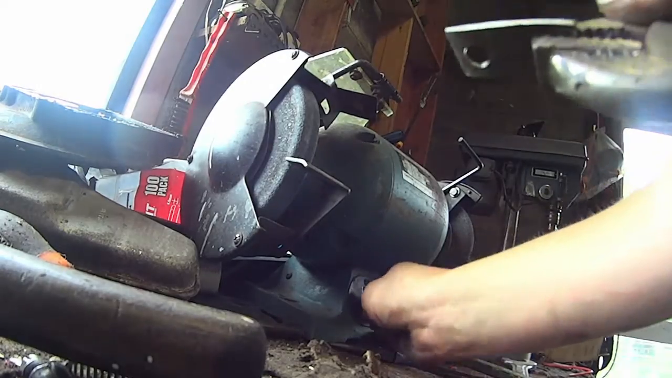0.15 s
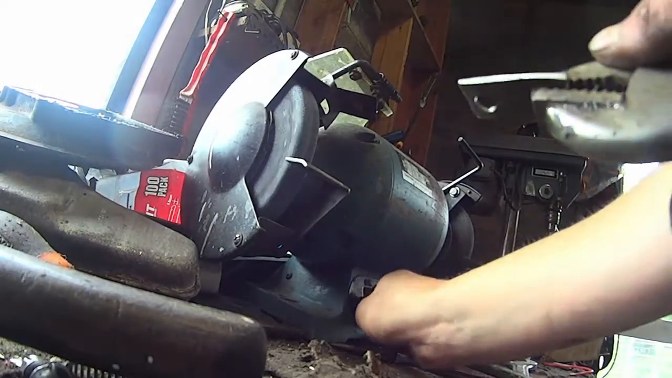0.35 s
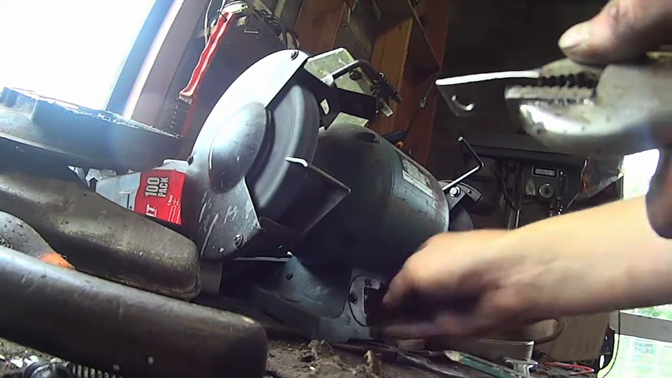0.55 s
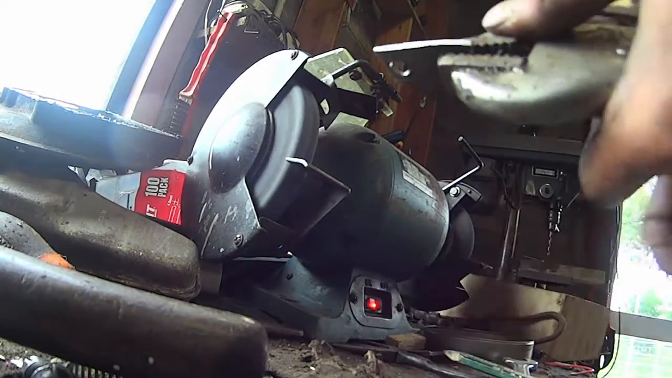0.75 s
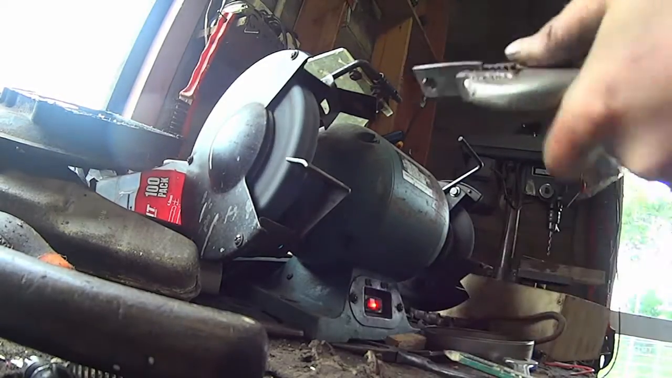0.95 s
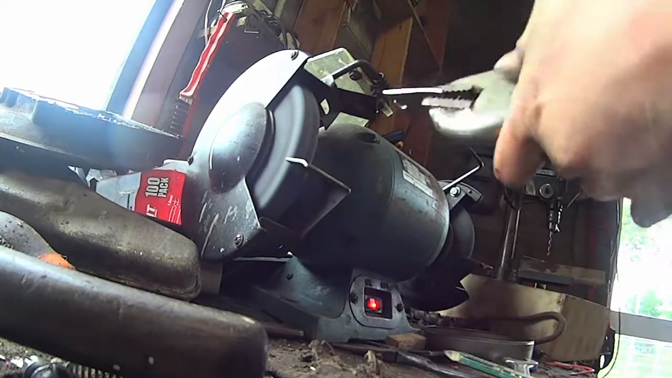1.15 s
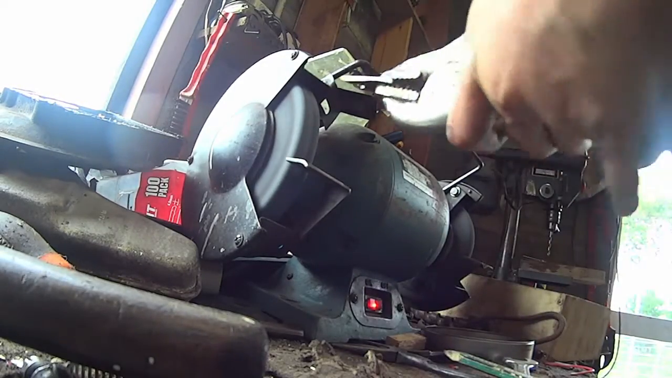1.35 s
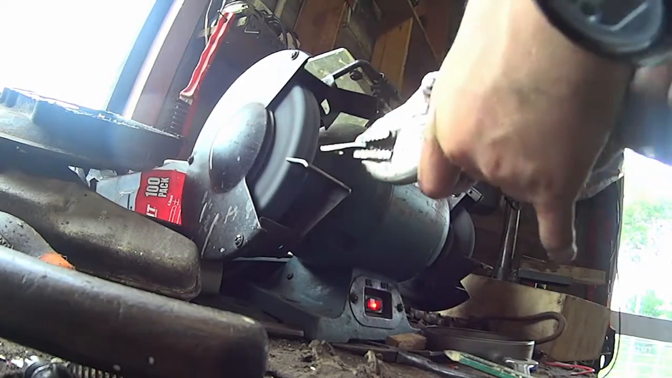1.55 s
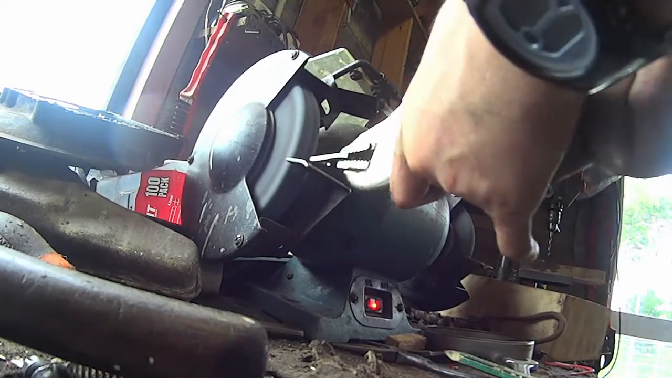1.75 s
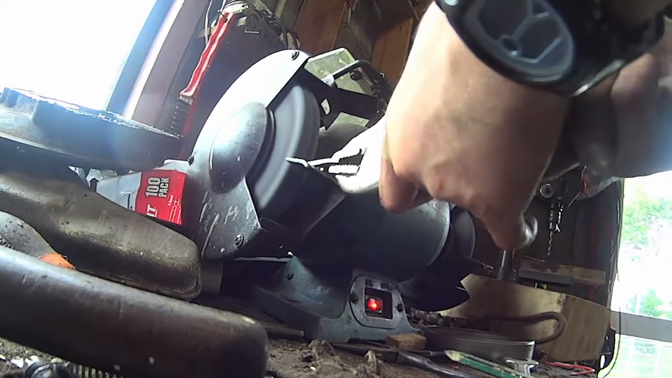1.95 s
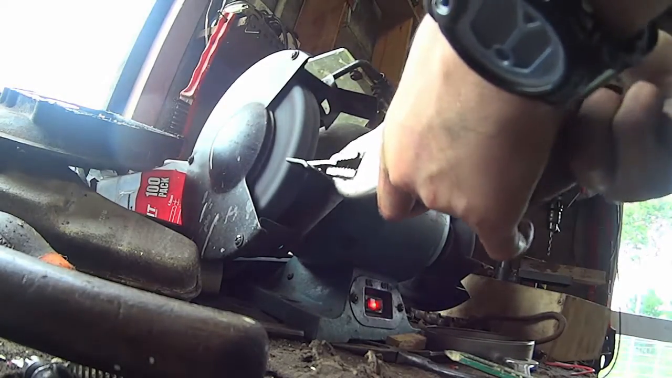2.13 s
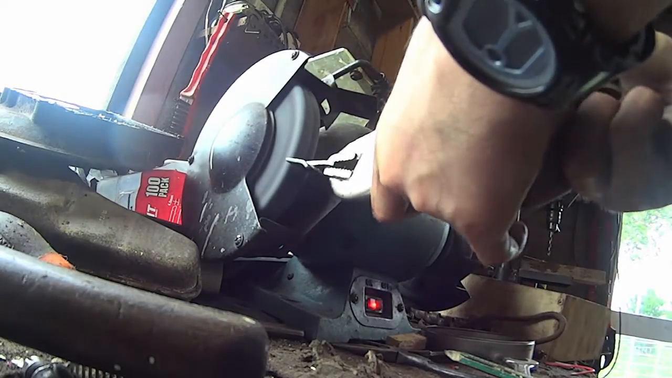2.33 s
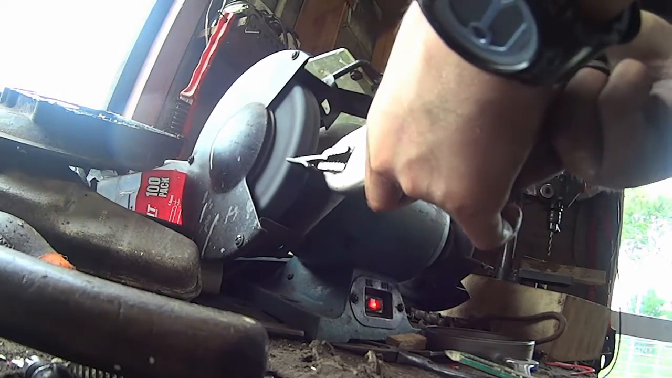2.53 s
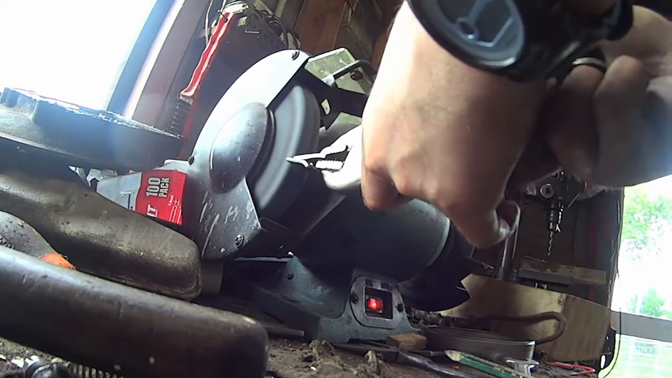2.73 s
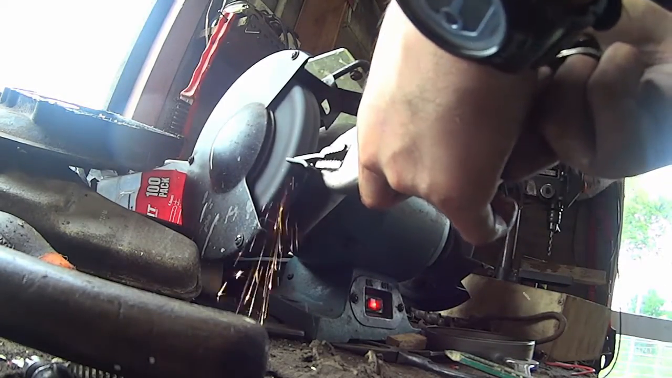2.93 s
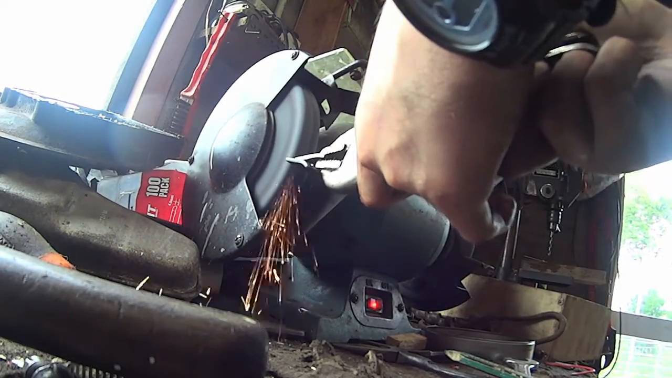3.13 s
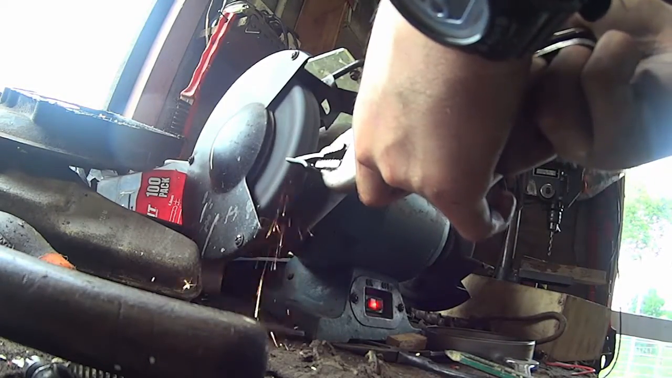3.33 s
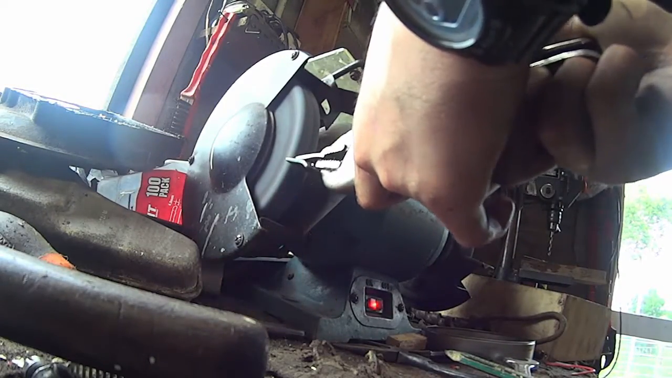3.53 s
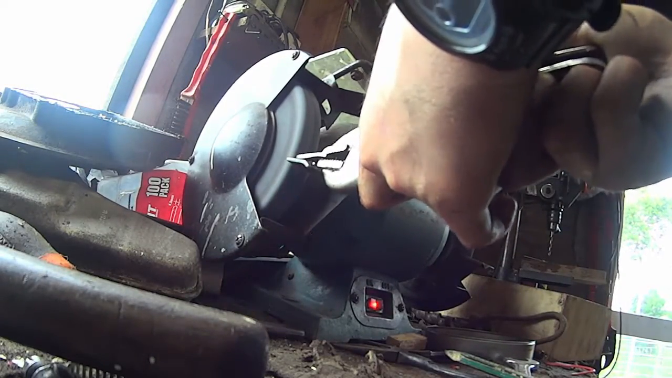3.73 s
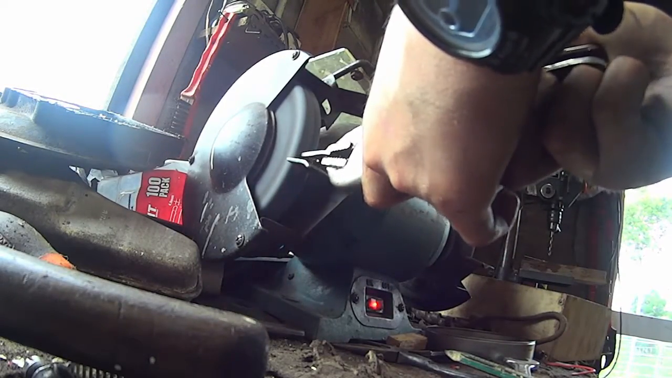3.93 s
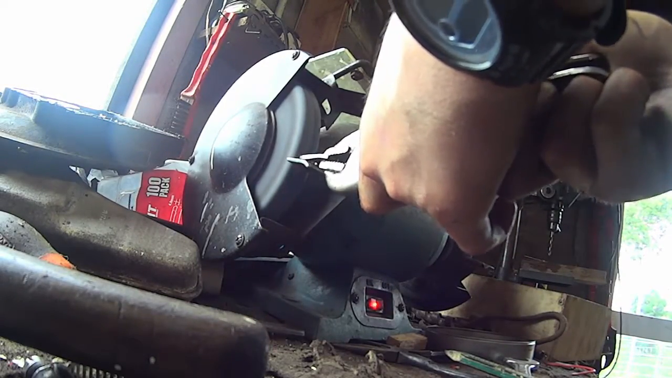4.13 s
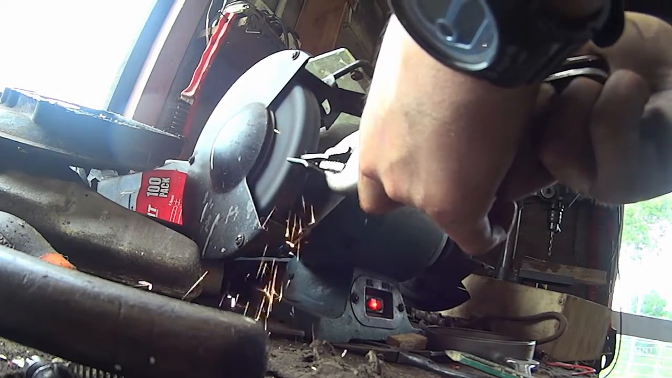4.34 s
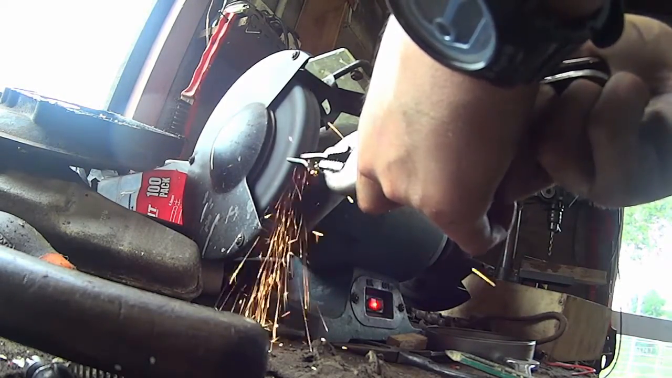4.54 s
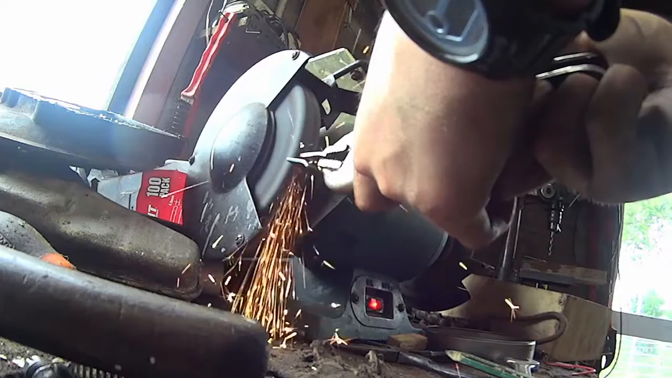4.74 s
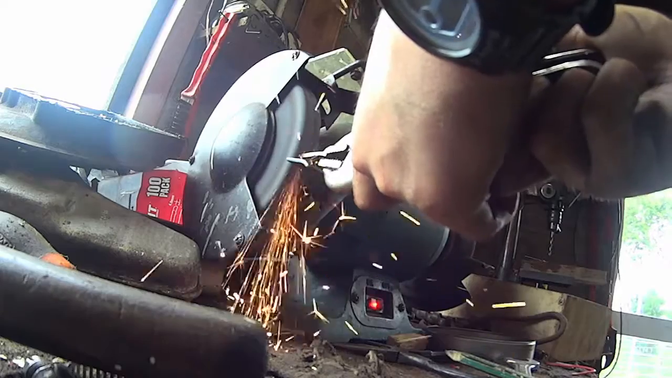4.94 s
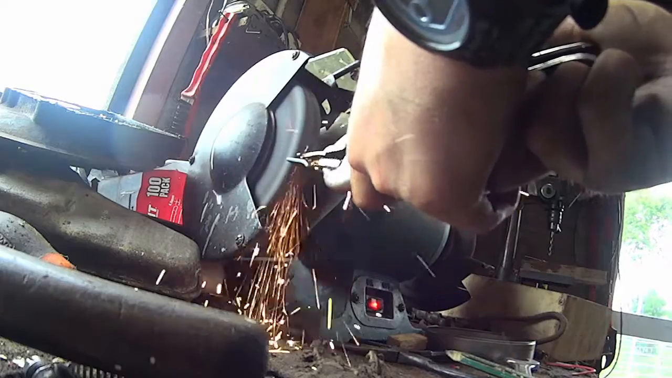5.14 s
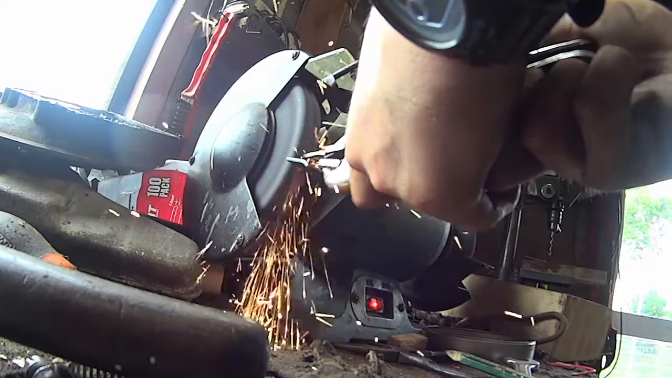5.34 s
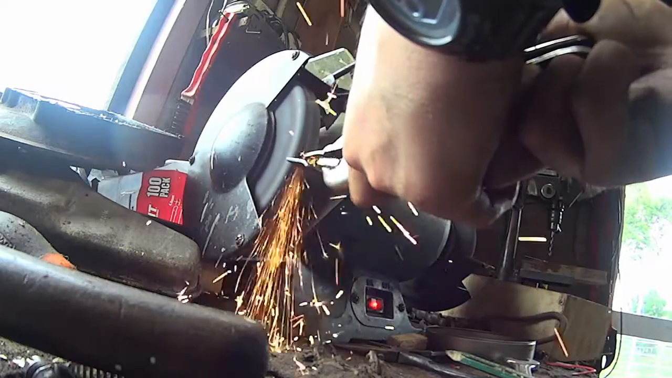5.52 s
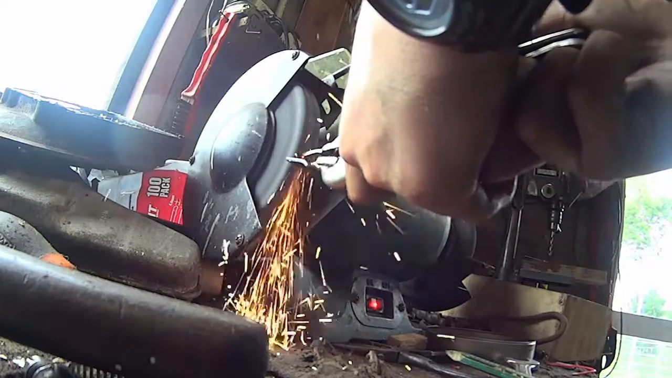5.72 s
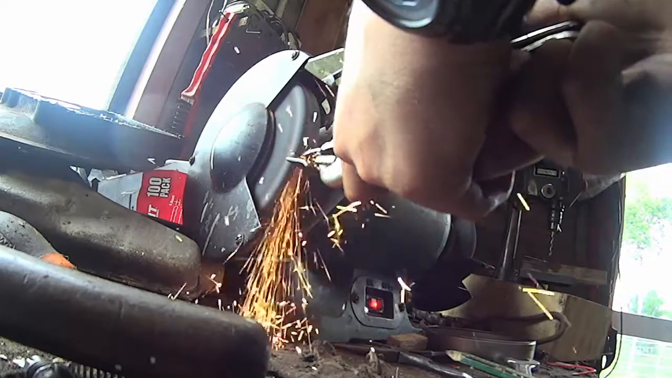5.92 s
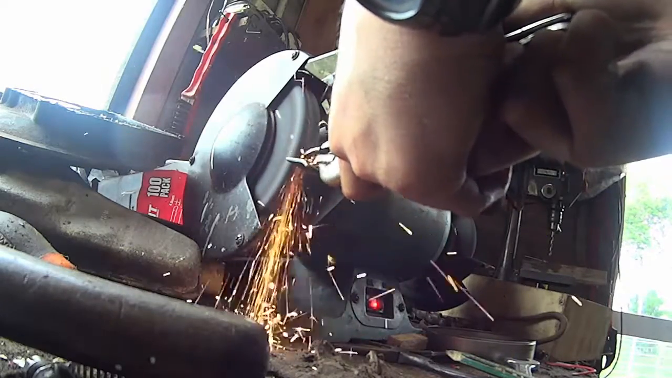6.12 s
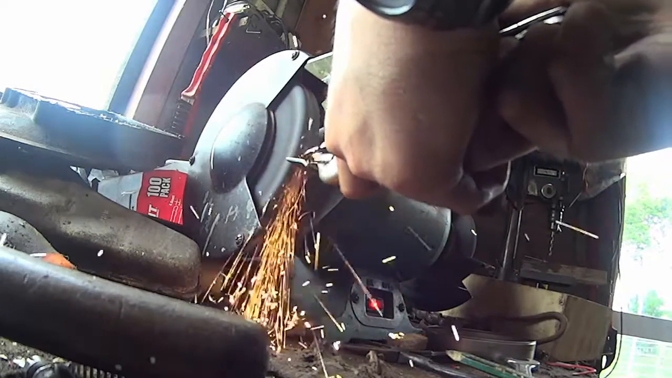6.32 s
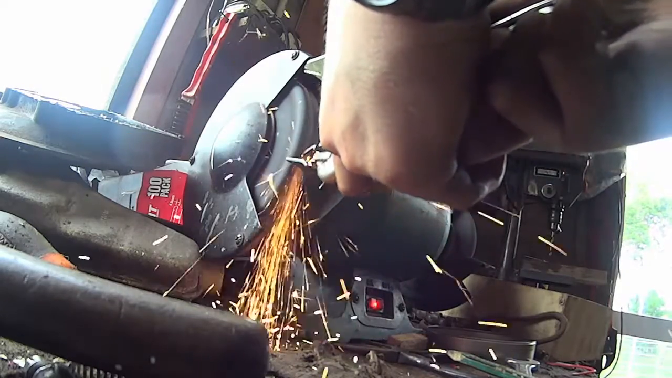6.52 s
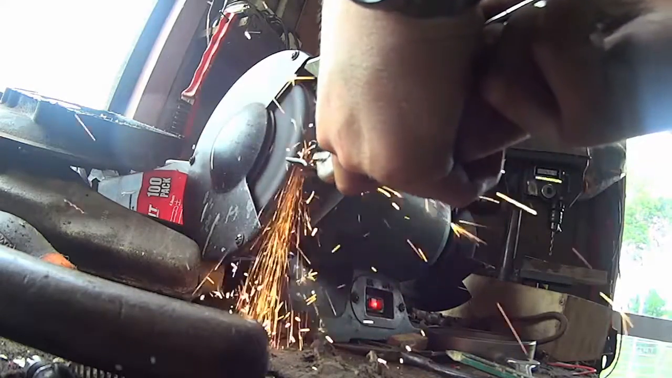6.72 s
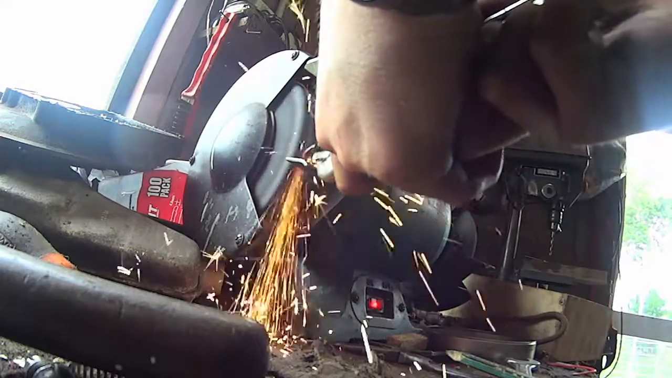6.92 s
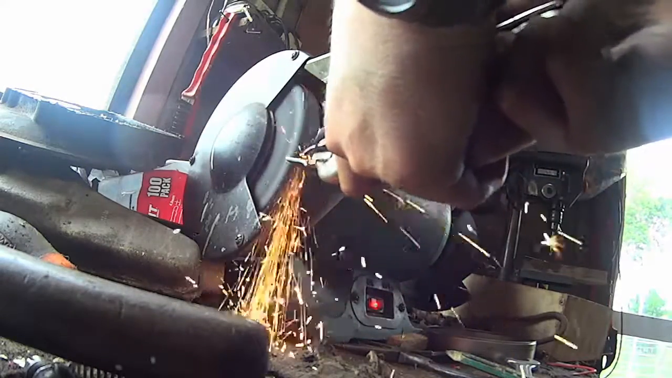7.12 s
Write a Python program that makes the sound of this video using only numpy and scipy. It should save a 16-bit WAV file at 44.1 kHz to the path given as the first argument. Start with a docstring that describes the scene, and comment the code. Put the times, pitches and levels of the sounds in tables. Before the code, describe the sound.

Close up at a workbench: quiet room, a hard click, then a mains buzz and metallic housing rattle as a motor winds up. The wheel runs free with a droning, gently beating hum and soft ticks from pliers. Light, gritty touches follow, pulsing with each turn, before sustained grinding rings the steel part, chattering and squealing while the wheel slows slightly. Short room reflections; loud parts sound compressed.

```python
"""In a small workshop a bench grinder is switched on, buzzes up to speed and runs free.
Mains buzz, noise-driven housing modes, a bench drone, hum and coloured air make the motor.
A steel part in locking pliers touches the wheel lightly, then is pressed in: partly returning grit
rings modes of the part, and waves worn into the wheel lock its chatter into a squeal.
The loaded wheel slows, and gain control ducks the motor under the loud grinding."""
import sys
import numpy as np
from scipy import signal
from scipy.fft import rfft, irfft, next_fast_len
from scipy.io import wavfile
from scipy.ndimage import uniform_filter1d, minimum_filter1d, map_coordinates

SR = 44100
rng = np.random.default_rng(int(sys.argv[2]) if len(sys.argv) > 2 else 0)


def log_audio(samples):
    """Write samples as a 16-bit WAV file to the path given in sys.argv[1]."""
    # one column per channel
    frames = np.atleast_2d(samples).T
    # limit to full scale, then quantise
    limited = np.clip(frames, -1, 1)
    pcm = np.round(limited * 32767).astype(np.int16)
    wavfile.write(sys.argv[1], SR, pcm)


N = 320607  # samples
BUZZ_HZ = 100.2  # mains buzz, shared by the start-up and the running hum


def gain_of(db):
    """Turns dB into an amplitude gain."""
    return 10 ** (np.asarray(db) / 20)


def evened(x):
    """Scales a signal to mean power 1."""
    return x / np.sqrt(np.mean(x ** 2) + 1e-20)


def curves(rows, outside=None):
    """Draws the columns of a timed table as curves, one value a sample."""
    s, *columns = np.transpose(rows)
    time_s = np.arange(N) / SR
    return [np.interp(time_s, s, column, outside, outside) for column in columns]


def colour(x, points):
    """Minimum-phase filter through the given spectrum; white input of power 1 leaves with power 1."""
    hz, db = np.transpose(points)
    bin_hz = abs(np.fft.fftfreq(8192, 1 / SR))
    bin_db = np.interp(np.log(bin_hz + 1), np.log(hz), np.maximum(db, -100), -100, -100)
    log_gain = bin_db * np.log(10) / 20
    minimum_phase = np.exp(np.conj(signal.hilbert(log_gain)))
    taps = np.fft.ifft(minimum_phase).real[:4096]
    return signal.oaconvolve(x, taps / np.linalg.norm(taps))[:N]


def ring(x, hz, width_hz):
    """A damped mode at a fixed or moving pitch; white input of power 1 leaves with power 1."""
    turn = np.exp(2j * np.pi * np.cumsum(hz * np.ones(N)) / SR)
    decay = np.exp(-np.pi * width_hz / SR)
    envelope = signal.lfilter([np.sqrt(2 * (1 - decay * decay))], [1, -decay], x / turn)
    return (turn * envelope).real


def body(x, modes):
    """Rings modes side by side with alternating sign, sharing power 1 by their relative dB."""
    share = gain_of([db for _, _, db in modes])
    rung = sum((-1) ** k * share[k] * ring(x, hz, width) for k, (hz, width, _) in enumerate(modes))
    return rung / np.linalg.norm(share)


def wander(rate_hz):
    """Slow random drift of power 1: noise rolled off above the rate."""
    size = next_fast_len(N)
    rolloff = 1 + (np.fft.rfftfreq(size, 1 / SR) / rate_hz) ** 2
    return evened(irfft(rfft(rng.standard_normal(size)) / rolloff, size)[:N])


def highpass(x, hz):
    """Third-order high-pass."""
    return signal.sosfilt(signal.butter(3, hz, "high", fs=SR, output="sos"), x)


# Room tone spectrum: pitch_hz [Hz], level_db [relative dB per Hz]
ROOM_COLOUR = [(20, -20), (110, -18), (180, -6), (320, 0), (420, -10.5), (1500, -21.5), (11200, -27)]


def room_tone():
    """The quiet room: steady noise weighted towards the low mids."""
    return gain_of(-50) * colour(rng.standard_normal(N), ROOM_COLOUR)


# Motor levels up to speed: start_s [s], drone_db [dB before a 3 dB lift], hum_db [dB], air_db [dB]
MOTOR_LEVELS = [(.31, -81, -90, -87.5), (.4, -66, -52, -70), (.85, -33, -60.5, -30.5), (1.0, -38, -48, -23),
                (1.3, -29, -44, -30), (1.6, -28, -46, -29)]
# Bench modes: pitch_hz [Hz], width_hz [Hz], level_db [relative dB]
BENCH_MODES = [(244.7, 24.3, 0.5), (281.5, 51, 2), (326.7, 44, -0.5), (394.6, 19, -7), (575, 160, -9.5),
               (1200, 12, -18), (1590, 18, -37)]
# Air of the wheels: pitch_hz [Hz], level_db [relative dB per Hz]
AIR_COLOUR = [(260, -10.5), (450, -7.5), (596, -14.5), (821, -16.5), (1600, -6), (1910, -11.5),
              (3000, -13.5), (4100, -17), (5490, -5), (6500, -11), (11000, -9), (14300, -35), (22000, -120)]
# Low shaking of the bench: pitch_hz [Hz], level_db [relative dB per Hz]
SHAKE_COLOUR = [(15, -25), (25, -22), (40, 2), (65, -6.5), (130, -8), (230, 2.5), (300, -44)]
# the hum beats against twice the wheel's turn, at a set rate
BEAT_HZ, BEAT_DEPTH, BEAT_TOP_S = 1.265, 0.3, 1.73


def running():
    """The motor: noise rings the bench in lumps, with a beating sine hum, low shaking and airy noise."""
    drone_db, hum_db, air_db = curves(MOTOR_LEVELS)
    time_s = np.arange(N) / SR
    lumps = rng.standard_normal(N) * gain_of(2.7 * wander(38))
    drone = body(lumps, BENCH_MODES) * gain_of(drone_db + 3.0)
    beat = 1 + BEAT_DEPTH * np.cos(2 * np.pi * BEAT_HZ * (time_s - BEAT_TOP_S))
    hum_gain = np.sqrt(2) * beat * gain_of(hum_db + 0.93 * wander(10.0))
    hum = hum_gain * np.sin(2 * np.pi * BUZZ_HZ * time_s)
    shudder_db = curves([(.85, 1), (1.3, 5.3), (1.6, 1.6)])[0]  # the wheels pass the bench's own pitch
    shake = gain_of(hum_db + shudder_db + 1.0) * colour(rng.standard_normal(N), SHAKE_COLOUR)
    air = gain_of(air_db + 1.4 * wander(20)) * colour(rng.standard_normal(N), AIR_COLOUR)
    return drone + hum + shake + air


# The starting winding shakes the housing: start_s [s], rattle_db [dB driving housing and noise],
# steady_buzz_db, swelling_buzz_db [dB, added to each harmonic's own]
START_LEVELS = [(.32, -63, -33.5, -43), (.45, -37, -38, -45), (.7, -25.5, -31, -43),
                (.75, -22.5, -32.5, -29.5), (.93, -22.5, -38, -20.5), (1.02, -20, -32, -24.5),
                (1.19, -22.5, -37.5, -43), (1.25, -36, -41, -25.5), (1.3, -68, -55, -38)]
# Buzz harmonics: multiple [of the mains buzz], level_db [dB added to its group],
# group [0 steady buzz, 1 buzz swelling late in the run-up]
BUZZ_HARMONICS = [(2, 1, 0), (3, -17, 0), (4, 4.5, 1), (5, -4.5, 0), (6, 2, 1), (7, -9, 0)]
# Housing modes: pitch_hz [Hz], width_hz [Hz], level_db [relative dB]
HOUSING_MODES = [(564.6, 14, 2), (937, 11, 2.5), (1569, 22, 6), (1365, 11, -2.5), (4710, 40, -5.5),
                 (5770, 110, -2.5), (8000, 120, -20), (9200, 800, -0.5), (9700, 140, -6)]
# Loose rattle spectrum: pitch_hz [Hz], level_db [relative dB per Hz]
RATTLE_COLOUR = [(150, -47), (600, -22), (1500, 7.5), (2200, -3), (11200, -8)]
# Rotor slots sweeping up: start_s [s], pitch_hz [Hz], level_db [dB]
ROTOR_WHINE = [(.8, 428, -64), (.95, 618, -21), (1.05, 777, -30), (1.15, 925, -46)]


def start_up():
    """Mains harmonics buzz, noise pulsing with the mains shakes the housing, a rising mode whines."""
    rattle_db, *group_db = curves(START_LEVELS, -120)
    mains = 2 * np.pi * BUZZ_HZ * np.arange(N) / SR
    buzz = np.zeros(N)
    for multiple, db, group in BUZZ_HARMONICS:
        gain = np.sqrt(2) * gain_of(db + group_db[int(group)] + 3.37 * wander(17.6))
        buzz += gain * np.sin(multiple * mains + 2 * np.pi * rng.random())
    pulsing = rng.standard_normal(N) * (1 + 0.11 * np.cos(mains)) * gain_of(2.16 * wander(45))
    shake = evened(pulsing) * gain_of(rattle_db)
    housing_db = curves([(.45, -3), (.7, 0.5)])[0]
    housing = gain_of(housing_db) * body(shake, HOUSING_MODES)
    rattle = gain_of(-6.0) * colour(shake, RATTLE_COLOUR)
    whine_hz = curves(ROTOR_WHINE)[0]
    whine_db = curves(ROTOR_WHINE, -120)[1]
    whine = gain_of(whine_db) * ring(rng.standard_normal(N), whine_hz, 25)
    return buzz + housing + rattle + whine


# Finger, switch, starter switch, pliers: start_s [s], peak_db [dB, hollow part],
# tick_db [dB over the hollow part], pitch_hz [Hz], t60_s [s], spread_s [s, decay of the scatter]
KNOCK_HITS = [(.226, -33, -26, 680, .04, 0.0024), (0.309, 8.5, -4.5, 682, 0.065, 0.0025),
              (1.217, -14, 6, 584, 0.35, 0.028), (1.826, -17, -0.5, 580, 0.16, 0.0032),
              (2.464, -23, -12, 580, 0.077, 0.0031), (2.525, -18, -7, 400, 1, 0.0065)]
# Spectrum of the snap: pitch_hz [Hz], level_db [relative dB per Hz]
SNAP_COLOUR = [(400, -60), (900, -28), (2000, 0), (3000, -6), (6000, -8), (9500, -8), (11200, -9)]


def knocks():
    """Handling knocks: scattered blows ring two decaying sines under a dry noise snap."""
    out, t = np.zeros(N), np.arange(8000) / SR
    for s, db, tick_db, hz, t60, spread in KNOCK_HITS:
        sparse = rng.random(2000) < .02
        blows = rng.standard_normal(2000) * np.exp(-t[:2000] / spread) * sparse
        blows[0] = 2.6
        tones = np.sin(2 * np.pi * hz * t) + .5 * np.sin(2 * np.pi * 1.15 * hz * t)
        hollow = highpass(np.convolve(blows, gain_of(-60 * t / t60) * tones)[:8000], 460)
        fall = np.exp(-t / (1.06 * spread)) + 0.15 * np.exp(-t / 0.012)
        snap = colour(rng.standard_normal(8000) * fall, SNAP_COLOUR)[:8000]
        knock = hollow / abs(hollow).max() + gain_of(tick_db) * snap / abs(snap).max()
        out[round(s * SR):][:8000] += gain_of(db) * knock
    return out


# Wheel speed, slowing under load: start_s [s], speed [turns/s]; the high spot passes at the first row
WHEEL_SPEED = [(2.793, 49.65), (3.1, 49.09), (3.45, 49.38), (3.75, 49.88), (4.2, 49.95), (4.6, 49.07),
               (5.0, 48.38), (5.4, 48.23), (5.8, 47.78), (6.2, 47.72), (6.45, 47.69), (6.7, 47.33),
               (7.0, 47.27), (7.27, 47.15)]


def wheel_turns():
    """The wheel's angle in turns since the high spot first passes: its speed added up."""
    speed = curves(WHEEL_SPEED)[0]
    started = np.arange(N) >= WHEEL_SPEED[0][0] * SR
    return np.maximum(np.cumsum(speed * started) / SR, 0)


GRIT_STAYS = 0.76  # share of the grit pattern carried into the next turn, at wear 1


def grit(turns, wear):
    """The wheel's random surface read at its angle; wear renews part of the pattern each turn."""
    count, spots = 230, 880  # turns, grit spots a turn
    fresh = rng.standard_normal((count, spots))
    coarse = gain_of(2.0 * np.minimum(rng.exponential(1, spots), 4))  # some spots stand prouder
    keep = GRIT_STAYS ** wear
    pattern = signal.lfilter([np.sqrt(1 - keep ** 2)], [1, -keep], fresh, axis=0)
    surface = (pattern * coarse).ravel()
    return evened(map_coordinates(surface, [turns * spots], order=3))


def contact_window(angle, length):
    """Pressure falling away after the high spot, power 1 over a turn."""
    return np.exp(-angle / length) / np.sqrt(length / 2 * (1 - np.exp(-2 / length)))


# One list a touch: start_s [s], level_db [dB, grinding], contact_turns [turns after the high spot,
# held within 0.03-5], seat [0 corner, 1 graze, 2 tap, 3 bite, 4 press, 5 squeal, 6 settled]
PART_TOUCHES = [
    [(2.79, -16, 0.043, 0.051), (2.834, -10, 0.18, 0.2), (2.9, -1, 0.92, 0.069), (3.016, -8, 0.077, 0.14),
     (3.12, 3.5, 0.59, 0.34), (3.26, 1.5, 0.77, 0.67), (3.36, -5.5, 0.56, 0.91), (3.447, -13.5, 0.36, 1)],
    [(3.741, -13, .2, 1.46), (3.812, -16.5, 0.066, 2.2)],
    [(3.942, -14.5, .14, 2.35), (4.006, -14, .15, 1.96), (4.035, -23, 0.087, 2.2)],
    [(4.162, 2, 0.013, 2.23), (4.27, -3.5, 0.32, 2.96), (4.63, 12.5, 0.33, 3.3), (4.8, 13, 0.67, 3.25),
     (5.0, 9.5, 0.77, 3.46), (5.4, 8, 1.55, 4.04), (5.9, 6, 1.5, 4.58), (6.2, 22, 3.3, 4.66),
     (6.52, 16, 3, 5), (6.78, 10, 0.67, 5.4), (6.95, 3.5, 1.87, 6.01), (7.27, -2, 2.1, 5.37)],
]
# The part snags between high spots: start_s [s], level_db [dB, onset of a noise burst]
SNAGS = [(3.076, 8), (4.0415, 21)]
BLOW_TURNS = .045  # decay of the blow at the high spot


def contact(turns):
    """Grit under pressure: a sharp force for treble modes, a softer sway for the low, and the level."""
    surface = grit(turns, 1)
    shape = grit(turns, 0.98)  # a separate surface that renews slightly less each turn
    angle = turns % 1
    level, window, push = np.zeros((3, N))
    for rows in PART_TOUCHES:
        on = curves([(rows[0][0], 1), (rows[-1][0], 1)], 0)[0]
        level_db, length, _ = curves(rows)
        length = np.clip(length, .03, 5)
        blow = 0.96 * np.exp(-length / 0.42)  # a light touch is mostly one blow a turn
        drag_power = (1 - blow) * contact_window(angle, length) ** 2
        blow_power = blow * contact_window(angle, BLOW_TURNS) ** 2
        level += on * gain_of(level_db)
        window += on * np.sqrt(drag_power + blow_power)
        push += on * contact_window(angle, length + 0.045) * (1 - np.exp(-angle / 0.12))
    force = level * window * surface
    sway = level * push * shape
    for s, db in SNAGS:
        burst = rng.standard_normal(60) * np.exp(-np.arange(60) / 5.1)
        force[round(s * SR):][:60] += gain_of(db) * burst
    return force, sway, level


# Mode families of part and pliers: pitch_hz [Hz], width_hz [Hz], level_db [dB relative in the family]
PART_MODES = [
    [(5676, 130, -20)],
    [(3847, 52, 0)],
    [(6753, 310, 0)],
    [(7034, 120, 0)],
    [(7400, 130, 9.5), (8150, 730, 17), (8594, 160, 7.5)],
    [(2423, 33, 0)],
    [(1369, 14, 0), (1585, 17, 4), (1106, 27, -4.5), (1836, 19, -1)],
    [(590, 9.4, 15), (772, 18, -39)],
    [(4570, 12, 0)],
]
# Pliers' jaw, rung at every seat: pitch_hz [Hz], width_hz [Hz], level_db [dB]
JAW_MODES = [(390, 75, -30.5)]


def ringing_part(sway, treble, part_db):
    """Contact force rings each family of part and pliers as strongly as the seat allows."""
    out = sum(ring(sway * gain_of(db), hz, width) for hz, width, db in JAW_MODES)
    for db, modes in zip(part_db, PART_MODES):
        drive = treble if modes[0][0] > SR / 7 else sway
        out += body(drive * gain_of(db), modes)
    return out


# Free chatter at seats 0-6: pitch_hz [Hz]
SEAT_CHATTER_HZ = (2010, 1964, 1930, 2012, 2007, 1997, 2079)
# A row for each of three chatter partials, at seats 0-6: level_db [dB to the grinding level]
SEAT_CHATTER_DB = [(-23, -2.5, -22, -21, -14.5, -8, -14.5), (-51.5, -42, -40, -38, -16, -10, -18),
                   (-31, -9, -18, -24, -9, 5, -8.5)]


def chatter(sway, treble, level, turns, shares, seated):
    """Three partials bounce freely, or lock to 42 and 43 waves a turn as squealing sines."""
    out = np.zeros(N)
    free = np.sqrt(np.maximum(1 - (shares ** 2).sum(0), .03))
    # free Hz, width Hz, swell depth, place of the swell in turns
    partials = [(seated(SEAT_CHATTER_HZ), 40, .35, .3), (4030, 118, 0.57, 0.09), (6090, 226, 1.02, 0.3)]
    for k, (hz, width, depth, place) in enumerate(partials):
        swell = depth * np.cos(2 * np.pi * (turns - place))
        proud = evened(1 + swell + 0.4 * np.cos(4 * np.pi * (turns - .3)))  # louder where the wheel is proud
        squeal = sum(share * np.sin(2 * np.pi * (k + 1) * waves * turns)
                     for share, waves in zip(shares, (42, 43)))
        squeal *= np.sqrt(2) * level * proud * gain_of(0.95 * wander(26))
        loose = ring((treble if k > 1 else sway) * free, hz, width)
        out += gain_of(seated(SEAT_CHATTER_DB[k])) * (squeal + loose)
    return out


# Wheel tones under pressure: multiple [of the wheel's turn], level_db [dB over a part family],
# family [index into PART_MODES]
WHEEL_TONES = [(3, -14, 7), (12, 0, 7), (15, -8, 7), (23, -6, 6), (29, -2, 6)]


def wheel_tones(level, turns, shares, part_db):
    """Sines at multiples of the wheel's turn, following the locked share of the chatter."""
    out = np.zeros(N)
    for multiple, db, family in WHEEL_TONES:
        gain = gain_of(part_db[family] + db + 0.54 * wander(21))
        out += np.sqrt(2) * level * shares.max(0) * gain * np.sin(2 * np.pi * multiple * turns)
    return out


# Waves worn into the wheel: start_s [s], share_42, share_43 [amplitude 0-1 of 42 and 43 waves a turn]
WORN_WAVES = [(4.8, 0.26, 0), (5.4, 0.73, 0.042), (6.45, 0.83, 0.49), (6.6, 0.15, 0.78),
              (7.27, 0.087, 0.64)]
# A row for each family of PART_MODES, at seats 0-6: level_db [dB to the grinding level]
SEAT_PART_DB = [(-38, -33, -27.5, -15, -16.5, -33, -28), (-26.5, -25, -19, -15, -43, -23, -18),
                (-5.5, -2, -0.5, -7, -3, -3, -7), (-3, 3, 0, -21, -16, -16, -26),
                (-11, -18, -17, -41, -8, 1.5, -1), (-12.5, -29, -36, -48, -31, -38, -32),
                (-27, -18.5, -12, -26, -28, -19.5, -19.5), (-48, -43, -47, -49, -28.5, -28, -27),
                (-47, -47, -45, -55, -47, -44, -27)]
# Rasp at seats 0-6: level_db [dB to the grinding level]
SEAT_RASP_DB = (-20, -6, -23, -29, -17, -6, -12)
# Rasp spectrum: pitch_hz [Hz], level_db [relative dB per Hz]
RASP_COLOUR = [(700, -28), (1700, -3.5), (3300, -15), (4900, -51), (6800, -2), (9000, 6), (11200, -1.5)]
# Spectrum of the hiss of the cut: pitch_hz [Hz], level_db [relative dB per Hz]
SWARF_COLOUR = [(120, -23), (400, -6), (850, -13), (1700, 0.5), (3000, -11), (4900, -9), (6500, -4),
                (11200, -8)]
SWARF_DB = -20  # hiss under the grinding level


def grinding():
    """Grit strikes from the high spot on: the part rings and chatters over rasp and hiss of the cut."""
    turns = wheel_turns()
    force, sway, level = contact(turns)
    treble = highpass(highpass(force, SR / 9), SR / 9)
    seat = curves(sum(PART_TOUCHES, []))[2]

    def seated(values):
        """Blends a setting between neighbouring seats."""
        return np.interp(seat, range(len(values)), values)

    part_db = [seated(db) for db in SEAT_PART_DB]
    shares = np.array(curves(WORN_WAVES))
    ringing = ringing_part(sway, treble, part_db) + chatter(sway, treble, level, turns, shares, seated)
    tones = wheel_tones(level, turns, shares, part_db)
    swarf = colour(level * gain_of(SWARF_DB) * rng.standard_normal(N), SWARF_COLOUR)
    rasp = colour(force * gain_of(seated(SEAT_RASP_DB)), RASP_COLOUR)
    return highpass(ringing, 245) + tones + swarf + rasp


def reflections(x, t60_s=0.2):
    """Sparse reflections of random sign, dying away."""
    at = np.arange(200, 15000, 20) + rng.integers(0, 20, 740)
    taps = np.zeros(15100)
    taps[at] = rng.choice([-1., 1.], 740) * gain_of(-60 * at / SR / t60_s)
    return signal.oaconvolve(x, taps / np.linalg.norm(taps))[:N]


def scene():
    """Room tone and motor under the knocks and grinding, which alone get reflections."""
    background = room_tone() + running() + start_up()
    near = knocks() + grinding()
    return (background + near + gain_of(-15) * reflections(near))[None]


def recovering(db, db_per_s):
    """Follows rises at once and falls at a set speed."""
    fall = np.arange(N) * db_per_s / SR
    return np.maximum.accumulate(db + fall) - fall


KNEE_DB, SQUEEZE = -14.5, 0.91  # gain control threshold, share of the excess taken away
RECOVER_DB_PER_S = 268  # quick recovery
HELD, HELD_DB_PER_S = .48, 1.4  # share of the cut averaged over 0.1 s that lingers, its slow recovery
EDGE_HZ = 11030  # band limit


def record(dry):
    """Gain control on the loudest 5 ms of the last 22 ms, peaks rounded off, then the band limit."""
    power_db = 10 * np.log10(abs(uniform_filter1d(dry[0] ** 2, 221)) + 1e-12)
    loudest_db = -minimum_filter1d(-power_db, 971, origin=485)
    cut_db = SQUEEZE * np.maximum(loudest_db - KNEE_DB, 0)
    sustained_db = HELD * uniform_filter1d(cut_db, SR // 10, origin=SR // 20 - 1)
    quick_db = recovering(cut_db, RECOVER_DB_PER_S)
    slow_db = recovering(sustained_db, HELD_DB_PER_S)
    even = dry / gain_of(uniform_filter1d(np.maximum(quick_db, slow_db), 130))
    ceiling = .6
    soft = even / (1 + abs(even / ceiling) ** 4) ** (1 / 4)
    band_limit = signal.firwin(401, EDGE_HZ, window=("kaiser", 7), fs=SR)
    return signal.oaconvolve(soft, band_limit[None], "same")


dry = scene()
out = record(dry)
log_audio(out)
```